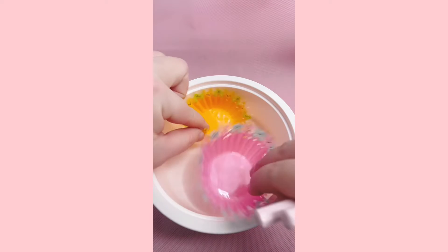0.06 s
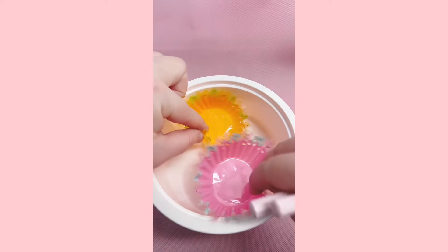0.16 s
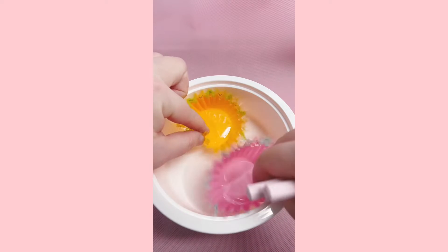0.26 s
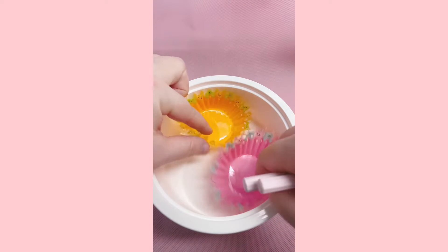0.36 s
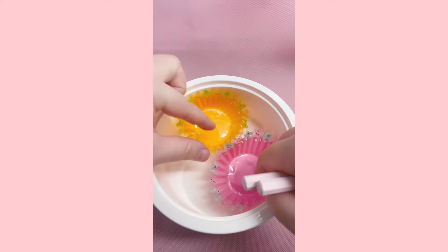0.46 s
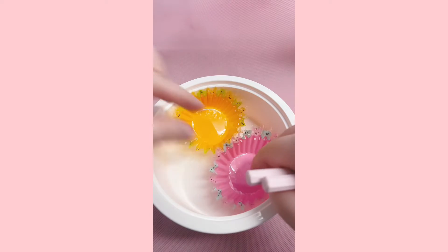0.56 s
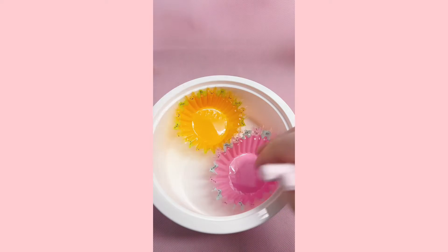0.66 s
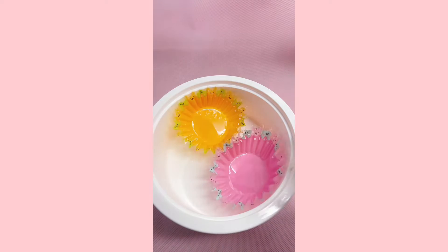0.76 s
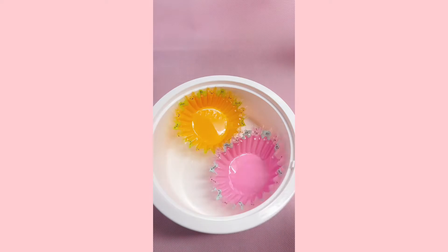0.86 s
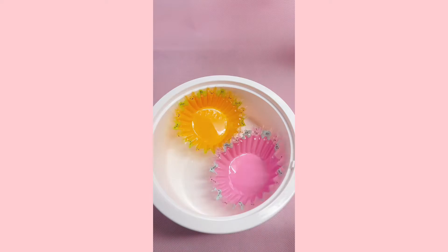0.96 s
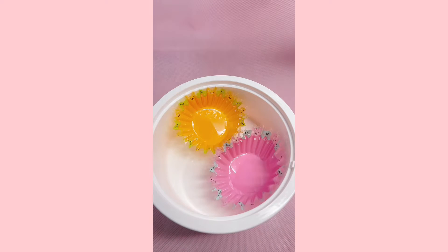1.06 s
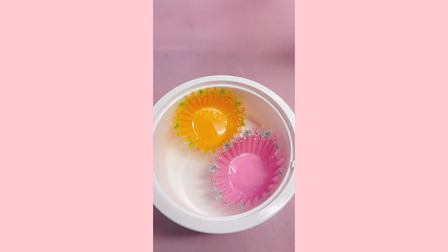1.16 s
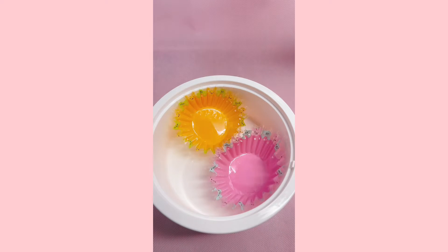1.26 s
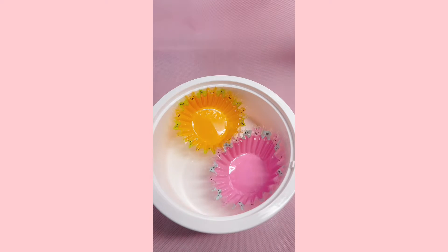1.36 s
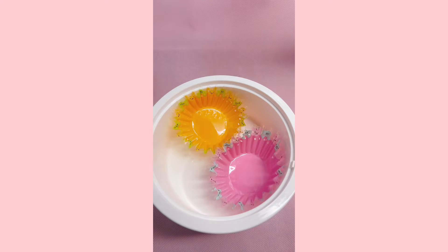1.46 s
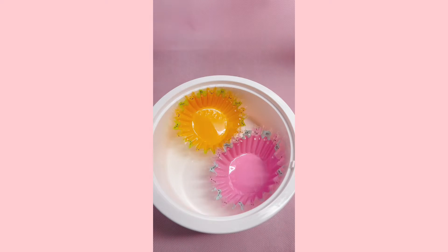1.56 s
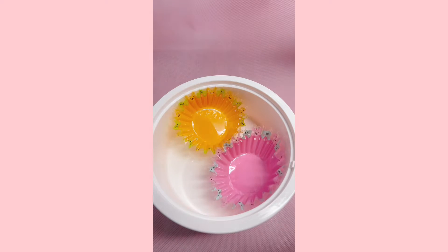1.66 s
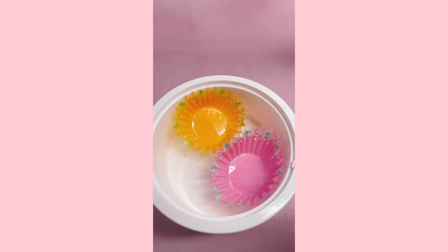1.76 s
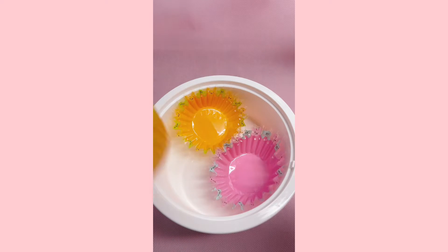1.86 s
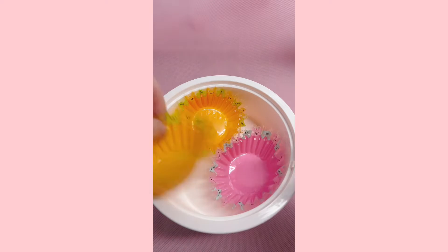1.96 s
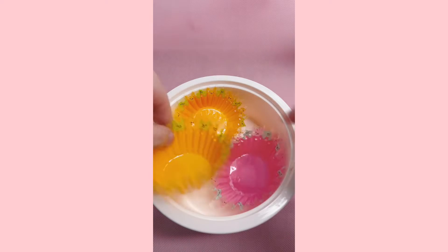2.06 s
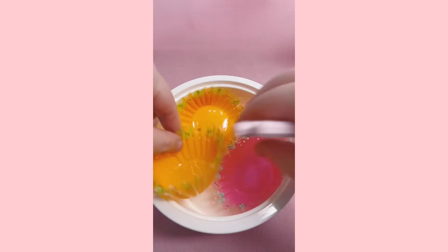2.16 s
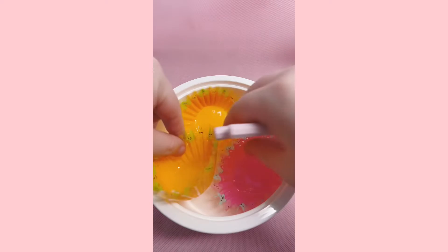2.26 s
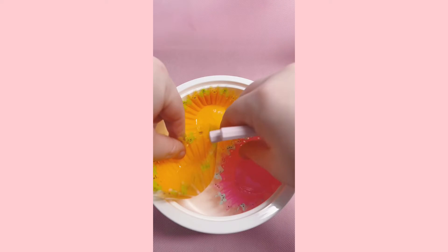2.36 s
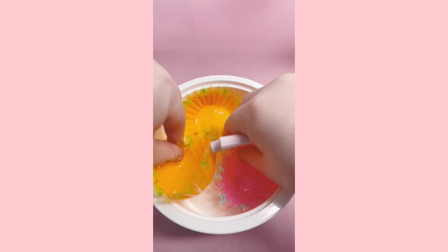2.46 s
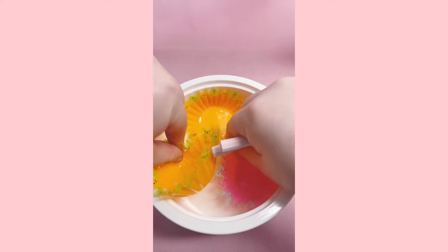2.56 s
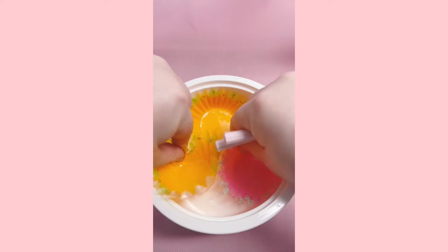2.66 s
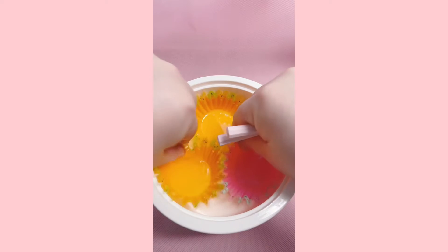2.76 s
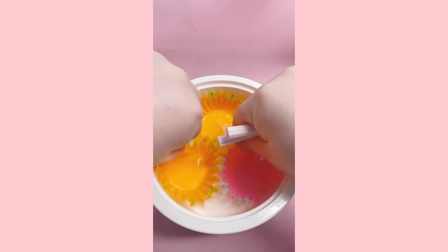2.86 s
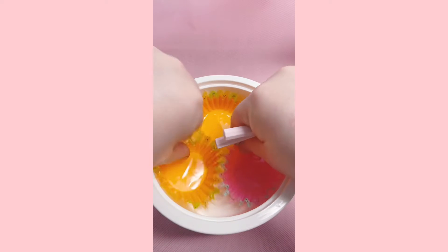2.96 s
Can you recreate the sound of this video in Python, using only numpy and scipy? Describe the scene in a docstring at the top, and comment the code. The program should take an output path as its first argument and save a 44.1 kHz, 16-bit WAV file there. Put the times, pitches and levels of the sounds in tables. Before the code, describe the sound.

Pleated paper cups crinkle and scrape in a plastic bowl, pause, give a couple of isolated snaps, then crackle busily again with soft low bowl thuds; close phone microphone, small quiet room.

```python
"""Pleated paper cups are pressed into a plastic bowl, close to a phone's microphone: pleats snap and scrape,
each a short flurry of tiny random slips that rings the paper and the bowl. Between them the paper rustles
under the fingers as clumped grains, and the bowl thuds softly in low decaying tones.
A small room answers with a short noise tail; room air hisses and an appliance hums far off."""
import sys
import numpy as np
from scipy import signal
from scipy.fft import rfft, irfft
from scipy.io import wavfile
from scipy.ndimage import map_coordinates

SR = 44100
rng = np.random.default_rng(int(sys.argv[2]) if len(sys.argv) > 2 else 0)


def store_wav(level_fs):
    """Save 16-bit WAV to argv[1]."""
    pcm = np.round(np.clip(np.atleast_2d(level_fs), -1, 1) * 32767)
    wavfile.write(sys.argv[1], SR, pcm.T.astype(np.int16))


def field_ratio(decibels):
    """Amplitude ratio for a level in dB (20 dB per decade); scalars and array-likes work."""
    return 10 ** (np.asarray(decibels, dtype=float) / 20)


N = 134505  # samples

# All levels in dB are relative; those of spectra give the shape alone.

# Room air at the microphone: pitch_hz, level_db
AIR_SPECTRUM = [(28, -8), (42, -32), (75, -10.5), (110, -12), (200, -22), (420, -16), (600, -25),
                (1200, -30), (3500, -32), (8000, -41), (11000, -49), (15000, -43.5)]
# Steady tones of the far appliance: pitch_hz, rms_db
HUM_TONES = [(59.2, -58.5), (236.9, -68.5)]
AIR_DB, HUM_WAVER_DB = -62.5, 0.1

# Finger pressure on the paper, joined by straight lines: time_s, body_level_db, treble_level_db
FINGER_PRESSURE = [(0, -52, -59.5), (.14, -58, -60.5), (.19, -60, -65.5), (.23, -50, -59.5),
                   (.3, -40, -47.5), (0.351, -62, -51), (0.38, -49.5, -43), (0.44, -49, -59),
                   (0.499, -64.5, -65), (.62, -94.5, -95), (1.19, -96, -83), (1.216, -49.5, -81),
                   (1.45, -73, -71), (1.55, -78.5, -90.5), (1.84, -75, -65), (1.888, -49.5, -60),
                   (1.94, -53.5, -62), (2.011, -64.5, -66), (2.059, -41, -57), (2.14, -56, -60.5),
                   (2.18, -47, -54.5), (2.238, -36.5, -42), (2.301, -53, -54), (2.34, -51.5, -58),
                   (2.401, -49.5, -42), (2.44, -54, -64), (2.54, -48, -49), (2.6, -45, -57),
                   (2.712, -43.5, -44.5), (2.82, -52.5, -56), (2.899, -51, -58), (2.96, -48, -53.5),
                   (3.05, -57, -54)]
RUSTLE_GRAINS_PER_S, RUSTLE_SPREAD_DB, CLUMP_DB = 2200, 0.5, 2.26  # grains per second in each band
BOWL_RUMBLE_DB = -6.5  # under the body of the rustle

# Body of the paper in the bowl: pitch_hz, level_db
PAPER_SPECTRUM = [(350, -84), (600, -12.5), (685, -15.5), (902, -4.5), (1370, -5), (1690, 2.5),
                  (2210, -6.5), (2710, -5.5), (3100, -12.5), (5000, -32), (6500, -81), (11000, -120)]
# Treble of scrapes and rustle: pitch_hz, level_db
HISS_SPECTRUM = [(2060, -35), (3500, -0.5), (5570, -3.5), (7410, -4), (10300, -14.5), (14800, -14),
                 (16000, -5.5)]
# Rumble of the bowl: pitch_hz, level_db
BOWL_SPECTRUM = [(100, -10.5), (260, -2), (330, 4), (460, 0.5), (650, -26.5)]
# Edges of the bands that slip independently: edge_hz
GRAIN_EDGES_HZ = [500, 1000, 1500, 2200, 3200, 4700, 6800, 10000, 14000, 19000]

# Decay of the small room: pitch_hz, t60_s
ROOM_DECAY = [(300, 0.6), (1500, 0.31), (6000, 0.26), (14000, 0.17)]
ROOM_DB = -12

# Slips shared by snaps and scrapes
SLIPS_PER_S, SLIP_SPREAD_DB = 6300, 3  # slips per second in each band
FIRST_SLIP_DB = 10.5  # boost of the slip that opens a flurry
RING_CYCLES = 18  # cycles in which a ring's exponential decay loses 60 dB

# Scrapes of pleat on pleat: start_s, level_db, treble_level_db, ring_hz, body_t60_s
SCRAPE_EVENTS = [(0.0139, -26, -42.5, 1508, 0.034), (0.058, -24, -31, 1635, 0.046),
                 (0.109, -29.5, -41.5, 1274, 0.074), (0.177, -40.5, -57, 2670, 0.05),
                 (0.253, -19, -30, 1750, 0.033), (0.27, -7.5, -22, 1800, 0.048),
                 (0.279, -25.5, -28, 1620, 0.12), (0.292, -23, -46, 1790, 0.057),
                 (0.328, -23, -46, 1800, 0.03), (0.378, -27.5, -31.5, 1850, 0.057),
                 (0.426, -27, -41.5, 1520, 0.05), (1.221, -22, -30.5, 1610, 0.024),
                 (1.261, -26, -42.5, 1440, 0.03), (1.475, -43.5, -81, 1340, 0.058),
                 (1.89, -17, -27.5, 1295, 0.032), (1.9212, -26.5, -45, 1220, 0.06),
                 (1.937, -22, -49, 1370, 0.029), (1.979, -25.5, -49, 1610, 0.048),
                 (2.022, -45, -46, 2470, 0.032), (2.035, -18.5, -31.5, 1263, 0.055),
                 (2.049, -19, -39, 1400, 0.031), (2.149, -22.5, -43, 1760, 0.039),
                 (2.169, -25.5, -50, 1685, 0.019), (2.191, -25, -36, 1490, 0.055),
                 (2.23, -17.5, -26.5, 1590, 0.025), (2.356, -26, -38, 1665, 0.073),
                 (2.403, -28, -28, 2180, 0.026), (2.453, -27.5, -41, 1660, 0.031),
                 (2.56, -20, -30, 1256, 0.068), (2.578, -28, -31.5, 1670, 0.099),
                 (2.724, -18, -45, 1650, 0.022), (2.736, -17.5, -56, 1580, 0.017),
                 (2.772, -21, -30.5, 1590, 0.036), (2.781, -26.5, -47, 1800, 0.052),
                 (2.85, -33.5, -38, 1770, 0.055), (2.864, -24, -38.5, 1023, 0.021),
                 (2.995, -32, -40, 1640, 0.043), (3.01, -30.5, -55, 1900, 0.15)]
SCRAPE_BODY_DB, SCRAPE_TREBLE_DB, SCRAPE_RING_DB = -10, -3.34, -1
SCRAPE_RISE_S, SCRAPE_TREBLE_T60_RATIO = 0.0011, 0.87

# Pleat snaps: start_s, level_db, treble_level_db, ring_hz, upper_ring_hz, body_t60_s
SNAP_EVENTS = [(0.0862, -32.5, -33, 2300, 2600, 0.032), (0.2356, -17.5, -10.5, 1960, 2890, 0.048),
               (0.509, -49, -48, 1560, 2750, 0.096), (0.544, -47, -44, 1480, 2830, 0.028),
               (0.569, -44, -45, 1525, 3880, 0.019), (1.195, -41, -38.5, 1807, 2400, 0.032),
               (1.2945, -16, -12.5, 1354, 2454, 0.033), (1.7088, -17, -12.5, 1680, 3290, 0.045),
               (2.376, -23.5, -25, 1780, 2400, 0.039), (2.469, -14.5, -13.5, 1680, 3330, 0.043),
               (2.557, -28, -42, 7340, 7300, 0.025), (2.647, -16, -14.5, 1556, 2630, 0.021),
               (2.669, -33, -20.5, 1710, 2640, 0.025), (2.945, -28.5, -35, 1750, 2770, 0.024),
               (2.957, -32.5, -35, 1590, 3150, 0.025)]
# Treble of snaps: pitch_hz, level_db
CRISP_SPECTRUM = [(2060, -21), (3500, -6.5), (5060, -8), (6700, -3), (10900, -14.5), (11600, -18.5),
                  (14500, -7.5), (16000, -6)]
SNAP_BODY_DB, SNAP_TREBLE_DB, SNAP_RING_DB, SNAP_UPPER_RING_DB = -8, -4.5, -2, -2.5
SNAP_RISE_S, SNAP_TREBLE_T60_RATIO = 0.00015, 0.55
SNAP_LOW_HZ = 893  # a snap has little below this

# Soft thuds of the bowl: start_s, level_db, pitch_hz
THUD_EVENTS = [(0.242, -37.5, 362), (0.29, -29, 320), (1.715, -42, 288), (1.891, -37.5, 375),
               (2.038, -31, 382), (2.356, -38.5, 298), (2.593, -34.5, 351), (2.683, -39.5, 305),
               (2.041, -47.5, 152)]
THUD_T60_S, THUD_RISE_S = 0.061, 0.00043


def unit(x):
    """Scale to rms 1."""
    return x / np.sqrt(np.mean(x ** 2) + 1e-20)


def along(points, hz):
    """Read (Hz, value) points on a log frequency axis."""
    f, v = np.transpose(points)
    return np.interp(np.log(hz + 1), np.log(f + 1), v)


def wobble(rate):
    """A smooth random curve with rate knots a second."""
    knots = rng.standard_normal(SR // 100)
    return map_coordinates(knots, [np.arange(N) * rate / SR], mode="mirror")


def coloured(x, spectrum):
    """Filter x through the minimum-phase pulse of this spectrum, of energy 1."""
    size = 8192
    level_db = np.maximum(along(spectrum, np.fft.rfftfreq(size, 1 / SR)), -90)
    # Folding the cepstrum onto positive time makes the filter causal
    cepstrum = irfft(np.log(field_ratio(level_db)))
    cepstrum[1:size // 2] *= 2
    cepstrum[size // 2 + 1:] = 0
    pulse = irfft(np.exp(rfft(cepstrum)))[:size // 2]
    return signal.fftconvolve(x, pulse / np.linalg.norm(pulse))[:N]


def add(track, start_s, sound):
    """Mix a sound into the track at a time."""
    track[round(start_s * SR):][:len(sound)] += sound


def slips(shape, per_s, spread_db):
    """Sparse clicks of random sign and size over a faint noise floor, rms 1."""
    happens = rng.random(shape) < per_s / SR
    size = np.minimum(rng.exponential(1, shape), 3.5)
    sign = rng.standard_normal(shape)
    return unit(happens * field_ratio(spread_db * size) * sign + 0.003 * sign)


def grains(envelope, per_s, spread_db, wander_db):
    """Slips under an envelope; each band slips on its own, so every grain has its pitch."""
    bands = list(zip(GRAIN_EDGES_HZ, GRAIN_EDGES_HZ[1:]))
    out = np.zeros(len(envelope))
    for band, clicks in zip(bands, slips((len(bands), len(envelope)), per_s, spread_db)):
        level = envelope * field_ratio(wander_db * wobble(55))
        sos = signal.butter(2, band, "band", fs=SR, output="sos")
        out += signal.sosfilt(sos, level * clicks)
    return out


def background():
    """Room air is coloured noise; the far appliance is a few slightly wavering sines."""
    out = field_ratio(AIR_DB) * coloured(rng.standard_normal(N), AIR_SPECTRUM)
    t = np.arange(N) / SR
    for hz, rms_db in HUM_TONES:
        level = np.sqrt(2) * field_ratio(rms_db + HUM_WAVER_DB * wobble(12.36))
        out += level * np.sin(2 * np.pi * (hz * t + rng.random()))
    return out


def rustle():
    """Paper slips in clumped grains under the fingers; the same pressure rumbles the bowl."""
    time_s, body_db, treble_db = np.transpose(FINGER_PRESSURE)
    t = np.arange(N) / SR
    clumps_db = CLUMP_DB * wobble(70)
    body_level = field_ratio(np.interp(t, time_s, body_db) + clumps_db)
    treble_level = field_ratio(np.interp(t, time_s, treble_db) + clumps_db)
    rumble = body_level * field_ratio(BOWL_RUMBLE_DB) * rng.standard_normal(N)
    body = grains(body_level, RUSTLE_GRAINS_PER_S, RUSTLE_SPREAD_DB, wander_db=2.5)
    treble = grains(treble_level, RUSTLE_GRAINS_PER_S, RUSTLE_SPREAD_DB, wander_db=2.5)
    return coloured(body, PAPER_SPECTRUM) + coloured(treble, HISS_SPECTRUM) + coloured(rumble, BOWL_SPECTRUM)


def room(x):
    """Reflections as a noise tail dying by frequency, drawn anew every tenth of a second."""
    out, step = np.zeros(N + SR), SR // 10
    for k in range(0, N, step):
        hz, t, z = signal.stft(rng.standard_normal(SR // 2), SR, nperseg=256)
        decay = field_ratio(-60 * t / along(ROOM_DECAY, hz)[:, None])
        tail = signal.istft(z * decay, SR, nperseg=256)[1]
        answer = signal.fftconvolve(x[k:k + step], tail / np.linalg.norm(tail))
        add(out, k / SR + 0.004, answer)  # the tail starts 4 ms late
    return out[:N]


def ringing(x, hz):
    """Excite one mode that swells briefly and dies."""
    t = np.arange(SR // 20) / SR
    mode = t * field_ratio(-60 * t * hz / RING_CYCLES) * np.sin(2 * np.pi * hz * t)
    return signal.fftconvolve(x, mode)


def flurries(events, rise_s, body_db, treble_db, treble_spectrum, treble_t60_ratio):
    """Slips that rise, die and ring their pleat, from (start_s, level_db, treble_level_db, t60_s, rings)."""
    body, treble, ring, first_body, first_treble = np.zeros((5, N + SR))
    t = np.arange(SR // 5) / SR
    rise = 1 - np.exp(-t / rise_s)
    for start_s, level_db, treble_level_db, t60_s, rings in events:
        low_db, high_db = level_db + body_db, treble_level_db + treble_db
        shape = field_ratio(low_db - 60 * t / t60_s) * rise
        add(body, start_s, shape)
        add(treble, start_s, field_ratio(high_db - 60 * t / (t60_s * treble_t60_ratio)) * rise)
        # One sharp click opens the flurry
        at, sign = round((start_s + rise_s) * SR), rng.choice([-1, 1])
        first_body[at] = sign * field_ratio(low_db + FIRST_SLIP_DB)
        first_treble[at] = sign * field_ratio(high_db + FIRST_SLIP_DB)
        clicks = shape * slips(len(t), SLIPS_PER_S, SLIP_SPREAD_DB)
        for hz, ring_db in rings:
            sound = ringing(clicks, hz)
            # Ring energy is set relative to the body envelope
            add(ring, start_s, field_ratio(ring_db) * sound * np.linalg.norm(shape) / np.linalg.norm(sound))
    low = grains(body[:N], SLIPS_PER_S, SLIP_SPREAD_DB, wander_db=1.0) + first_body[:N]
    high = grains(treble[:N], SLIPS_PER_S, SLIP_SPREAD_DB, wander_db=1.0) + first_treble[:N]
    return coloured(low, PAPER_SPECTRUM) + coloured(high, treble_spectrum) + ring[:N]


def scrapes():
    """Pleat drags on pleat: flurries with softer starts, a duller treble and one ring."""
    events = [(start_s, level_db, treble_level_db, t60_s, [(hz, SCRAPE_RING_DB)])
              for start_s, level_db, treble_level_db, hz, t60_s in SCRAPE_EVENTS]
    return flurries(events, SCRAPE_RISE_S, SCRAPE_BODY_DB, SCRAPE_TREBLE_DB,
                    HISS_SPECTRUM, SCRAPE_TREBLE_T60_RATIO)


def snaps():
    """Pleats give way: sudden, bright, thin flurries with two ringing pitches."""
    events = [(start_s, level_db, treble_level_db, t60_s, [(hz, SNAP_RING_DB), (upper_hz, SNAP_UPPER_RING_DB)])
              for start_s, level_db, treble_level_db, hz, upper_hz, t60_s in SNAP_EVENTS]
    full = flurries(events, SNAP_RISE_S, SNAP_BODY_DB, SNAP_TREBLE_DB,
                    CRISP_SPECTRUM, SNAP_TREBLE_T60_RATIO)
    return signal.sosfilt(signal.butter(4, SNAP_LOW_HZ, "high", fs=SR, output="sos"), full)


def thuds():
    """The bowl wall is pushed and rings low, each time as one decaying sine."""
    out, t = np.zeros(N + SR), np.arange(SR // 4) / SR
    rise = 1 - np.exp(-t / THUD_RISE_S)
    for start_s, level_db, hz in THUD_EVENTS:
        add(out, start_s, field_ratio(level_db - 60 * t / THUD_T60_S) * rise * np.sin(2 * np.pi * hz * t))
    return out[:N]


def scene():
    """Paper and bowl close by, the room's answer, then air and hum; one channel."""
    near = rustle() + scrapes() + snaps() + thuds()
    mix = near + field_ratio(ROOM_DB) * room(near) + background()
    return mix[None]


def roll_off(x):
    """The treble ends steeply here."""
    return signal.sosfilt(signal.butter(12, 17110, fs=SR, output="sos"), x)


def record(dry):
    """The phone passes little above its 16 kHz band limit, a steep low-pass."""
    low_pass = signal.ellip(10, 0.5, 70, 16000, fs=SR, output="sos")
    mix = signal.sosfilt(low_pass, dry)
    return roll_off(mix)


dry = scene()
out = record(dry)
store_wav(out)
```